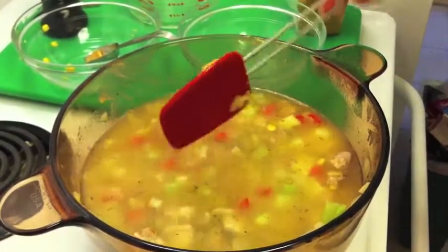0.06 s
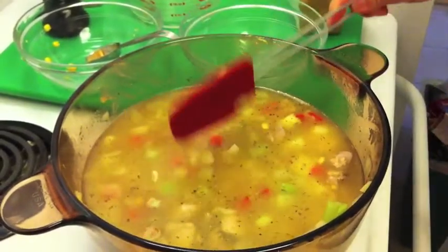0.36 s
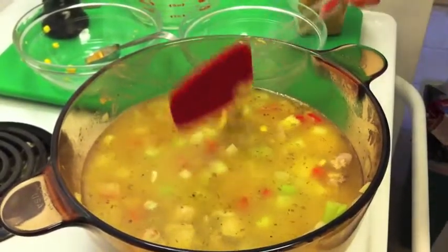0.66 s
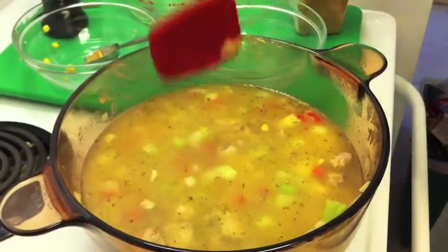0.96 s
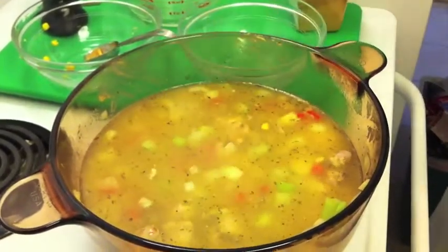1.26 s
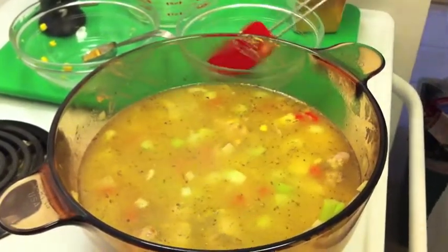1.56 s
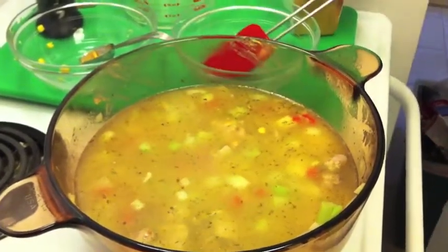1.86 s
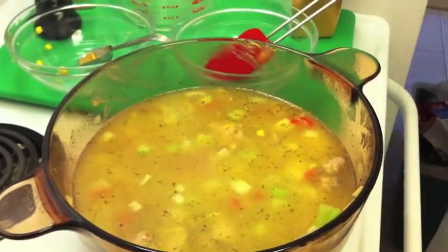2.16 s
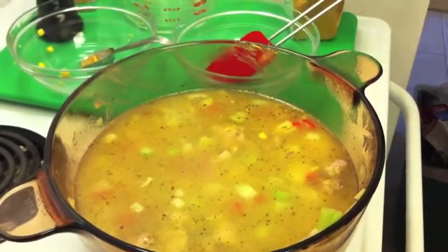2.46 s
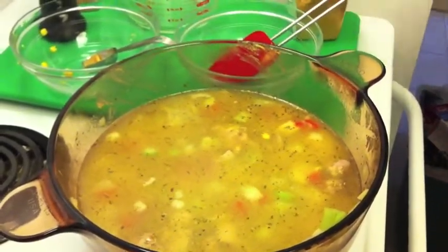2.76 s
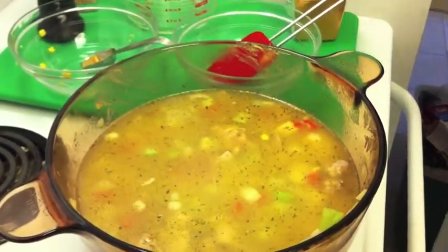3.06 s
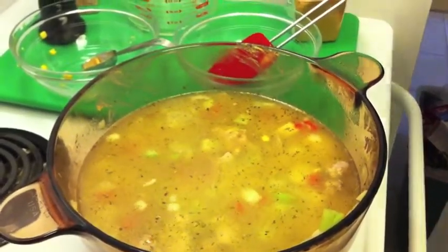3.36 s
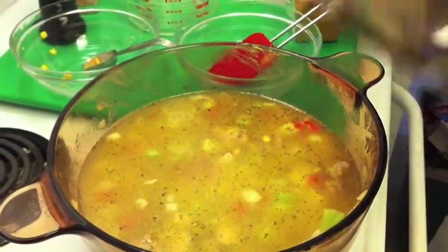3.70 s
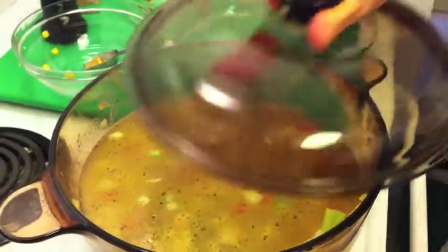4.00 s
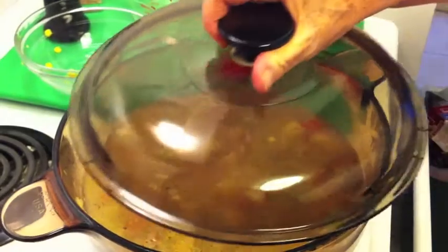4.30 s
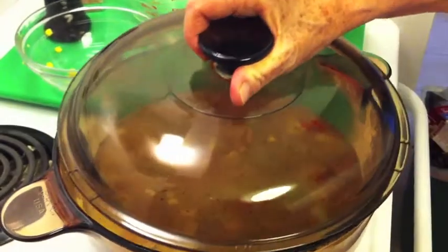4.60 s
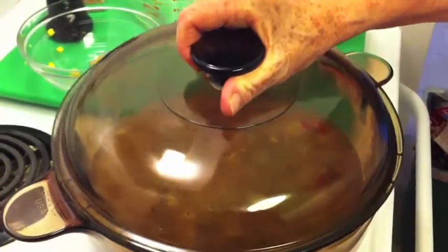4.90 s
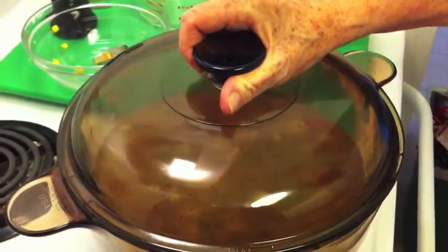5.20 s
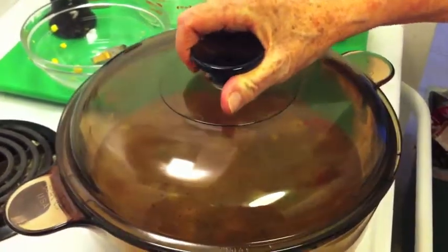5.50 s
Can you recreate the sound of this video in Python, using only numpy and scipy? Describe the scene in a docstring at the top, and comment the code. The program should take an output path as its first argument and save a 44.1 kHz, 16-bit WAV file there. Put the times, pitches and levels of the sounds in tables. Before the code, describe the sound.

In a small kitchen with faint room noise and hiss, heard from close by, a spatula is knocked against a glass pot in five quick taps. It is laid in a glass bowl with a soft rattle and two brighter clinks. Dull, quiet knocks and a few light ticks lead to the loudest sound: a glass lid landing on the pot with a clink, a brief high ring and a fast clatter.

```python
"""In a small, quiet kitchen, a rubber spatula is tapped clean on a glass pot of soup close by.
After a short crackle it drops into a glass bowl and rocks to rest, with a tick and a faint plop.
The glass lid is picked up with dull knocks; brushing, pings, a breath-like swell and clicks follow.
Last, the lid touches the pot, sings as it slides on the rim, and clatters into its seat.
Each blow on glass is a short crack, a noisy clatter and a set of ringing tones (modes)."""
import sys
import numpy as np
from scipy import signal
from scipy.io import wavfile

SR = 44100
rng = np.random.default_rng(int(sys.argv[2]) if len(sys.argv) > 2 else 0)


def waveform_to_disk(signal):
    """Save audio, clipped to [-1, 1], as 16-bit WAV at the path in sys.argv[1]."""
    frames = np.transpose(np.atleast_2d(signal))
    scaled = np.clip(frames, -1, 1) * 32767
    samples = np.round(scaled).astype(np.int16)
    wavfile.write(sys.argv[1], SR, samples)


N = 244557

# loudness of the background: t/s, room noise level/dB, hiss level/dB
BACKGROUND_LEVELS = [(0, -66, -81), (1.0, -67, -94), (1.3, -72, -86), (1.8, -72, -80), (2.1, -68, -72),
                     (3.4, -67.5, -67), (4.0, -68.5, -71), (5.55, -64.5, -71)]
# tone colour of the room noise and the hiss: f/Hz, level/dB
ROOM_COLOUR = [(25, 14), (70, -3), (130, 1), (260, 0.5), (450, -6), (1100, -5), (3000, -17), (8000, -26.5)]
HISS_COLOUR = [(2000, 0.5), (8000, -1.5), (15500, -6)]

# taps and light clicks on the pot, knocks on the lifted lid, the lid landing: t/s, level/dB
SPATULA_TAPS = [(0.2803, -34.5), (0.4385, -40.5), (0.5565, -35), (0.7217, -29.5), (0.9025, -31.5)]
POT_CLICKS = [(3.643, -42.5), (3.681, -49)]
LID_KNOCKS = [(2.593, -50), (2.683, -49.5), (2.705, -51.5)]
LID_LANDINGS = [(4.861, -42.5), (5.0407, -24), (5.072, -37), (5.1452, -34), (5.158, -32.5), (5.1956, -14.5),
                (5.2152, -23.5), (5.2316, -22), (5.2421, -26.5)]
# the spatula falls into the bowl and shifts twice: t/s, level/dB, treble tilt/(dB per octave)
BOWL_HITS = [(1.685, -45.5, -6), (1.702, -43.5, -6), (1.7277, -45.5, -5.5), (1.757, -53.5, -4),
             (2.1748, -32.5, 4.5), (2.183, -38.5, 2), (2.196, -38, 1), (2.3834, -41.5, 6),
             (2.388, -43, 3.5), (2.438, -52.5, -1)]

# the tones each object rings with: f/Hz, level/dB, t60/s (the time to fade by 60 dB)
POT_TONES = [(842, -19.5, 0.3), (1456, -9.5, 0.16), (1545, -16, 0.14), (13450, -14, .05)]
BOWL_TONES = [(374.2, -23.5, 0.26), (757, -22.5, 0.13), (1136, -17, 0.13), (1561, -14.5, 0.17),
              (1769, -10, 0.18), (1866, -14, 0.14), (3060, -20.5, 0.12), (3540, -10, 0.081),
              (4645, 2, 0.08), (4754, -6, 0.07), (6590, -8.5, 0.15), (8660, -12.5, 0.09), (8810, -12, 0.09),
              (9600, -13, 0.14), (10290, -17, .11), (10720, -20.5, 0.11), (11150, -16, 0.11),
              (12280, -19, 0.1), (13680, -19.5, .12), (14080, -20, .11), (14560, -23, .11)]
ROCKING_TONES = [(1010, -3.5, 0.057), (1134, -4, 0.05), (1930, -6.5, 0.1)]
LIFT_TONES = [(127, -3, 0.2), (420, 0.5, 0.11)]
RIM_TONES = [(2843, -6, 0.15), (2883, -14, 0.13), (3702, -12.5, 0.16), (4075, -6.5, 0.13),
             (4352, -0.5, 0.14), (6128, -16.5, 0.22), (6270, -17.5, 0.12), (8125, -23.5, 0.23),
             (8900, -36, .15), (10270, -25.5, 0.16), (12685, -32.5, .17), (13750, -37, .14),
             (14070, -33, .14), (15167, -34, .14)]  # the lid's high tones
TILTED_TONES = [(366.5, -3, 0.15), (598, -23, 0.6), (985, -14.5, 0.28), (1504, -9, 0.15),
                (1544, -10.5, 0.6), (1724, -8, 0.22), (2000, -7.5, 0.11)]  # lid on one edge
SEATED_TONES = [(255, -3.5, 0.1), (339, -13, 0.17), (903, -15.5, 0.28), (1103, -15.5, 0.21),
                (1397, -11.5, 0.14), (1460, -3, 0.23), (1664, -9, 0.23), (1584, -6.5, 0.16),
                (1710, -10, 0.26), (1990, -19, 0.26)]  # lid on the whole rim
# tone colour of the clatter, a crowd of short-lived tones under the clear ones: f/Hz, level/dB
POT_CLATTER = [(50, -14), (130, -6), (350, -0.5), (600, -3.5), (1400, 1), (2800, -9), (3700, 3.5),
               (4500, 3.5), (5500, -6.5), (6800, -0.5), (10000, -4), (16000, -7)]
BOWL_CLATTER = [(100, -9.5), (500, -8.5), (750, 5.5), (1800, 7.5), (2300, 4), (2800, -6.5), (3600, 5),
                (4700, 4), (5800, -0.5), (6600, 1.5), (7600, -11.5), (10000, -5.5), (15500, -25)]
LIFT_CLATTER = [(130, -2), (450, 0), (750, -4.5), (1600, -6.5), (8000, -41)]
LID_CLATTER = [(70, -31), (135, -9), (200, 8.5), (480, -4.5), (900, 2), (1700, 1), (2300, -1.5),
               (3400, -10), (4400, -5), (5400, -21), (6300, -16.5), (7300, -27.5), (10800, -32),
               (15500, -41)]

# dry ticks close by: t/s, level/dB, treble tilt/(dB per octave)
DRY_TICKS = [(1.918, -42.5, -5), (2.329, -49.5, -3), (3.9625, -46.5, -3.5), (4.5225, -46, -3),
             (4.861, -43.5, -5)]
# faint brushing as things are handled: middle t/s, length/s, level/dB
BRUSH_STROKES = [(2.495, 0.094, -61.5), (3.21, 0.13, -58), (3.565, .05, -59.5)]
# a faint, soft, breath-like swell of noise: middle t/s, length/s, level/dB
SOFT_SWELLS = [(3.425, 0.21, -61.5)]
# the rim sings as the lid is lifted or seated: middle t/s, length/s, f/Hz, level/dB
RIM_SLIDES = [(2.75, 0.14, 2420, -64), (2.78, .11, 1740, -64), (5.088, 0.08, 4342, -27.5),
              (5.078, .08, 2825, -35), (5.07, 0.07, 8120, -42), (5.07, .07, 6120, -39),
              (5.247, 0.035, 6130, -31), (5.252, .07, 2885, -33)]
# tiny glass pings: t/s, f/Hz, level/dB, t60/s
GLASS_PINGS = [(3.246, 3750, -56.5, 0.061), (3.597, 4240, -52.5, 0.044)]
# tone colour of the small noises: f/Hz, level/dB
CRACKLE_SPECTRUM = [(400, -36), (1000, -7), (2100, 1), (3500, -4), (6500, 3), (16000, -15)]
TICK_SPECTRUM = [(80, -12), (300, -6), (2000, -4.5), (4500, -13), (8000, -8), (10500, -31), (16000, -14)]
BRUSH_SPECTRUM = [(500, -27), (2500, -21), (4500, -2), (16000, -3)]
SWELL_SPECTRUM = [(700, -13), (1600, 3.5), (2700, -8), (14000, -22)]

FIRM_TAP_DB = -28.5  # softer taps are reckoned down from this level
RING_TIME = np.arange(SR // 2) / SR  # the half second after a blow


def amp(db):
    """Turns decibels into a factor to multiply by."""
    return 10 ** (np.asarray(db) / 20)


def read(points, hz):
    """Reads between the points of a curve, on a pitch-like (log) frequency scale."""
    f, value = np.transpose(points)
    return np.interp(np.log(hz + 1), np.log(f + 1), value)


def add(mix, s, sound):
    """Mixes a sound in, starting at s seconds."""
    part = mix[max(round(s * SR), 0):][:len(sound)]
    part += sound[:len(part)]


def colour(x, points, shape=lambda hz: 0, size=4096):
    """Gives a sound a tone colour (points plus shape, in dB); white noise keeps its power."""
    hz = abs(np.fft.fftfreq(size, 1 / SR))
    gain = amp(read(points, hz) + shape(hz))
    response = np.exp(np.conj(signal.hilbert(np.log(gain))))  # nothing sounds ahead of its cause
    taps = np.fft.ifft(response).real[:size // 2]
    return signal.fftconvolve(x, taps / np.linalg.norm(taps))[:len(x)]


def background(dip_s=1.59, dip_length_s=0.12, depth_db=-11, hiss_share=0.49):
    """Low room noise and a thin hiss; the level dips briefly after the crackle."""
    s, room_db, hiss_db = np.transpose(BACKGROUND_LEVELS)
    t = np.arange(N) / SR
    dip_db = depth_db * np.exp(-(2 * (t - dip_s) / dip_length_s) ** 4)
    room = amp(np.interp(t, s, room_db) + dip_db) * colour(rng.standard_normal(N), ROOM_COLOUR)
    hiss_gain = amp(np.interp(t, s, hiss_db) + hiss_share * dip_db)
    return room + hiss_gain * colour(rng.standard_normal(N), HISS_COLOUR)


def touch_db(hz, tilt_db, thud_db, knee_hz=1400):
    """A hard contact lifts the treble above the knee (tilt per octave); a heavy one adds thud."""
    return tilt_db * np.log2(np.hypot(hz, knee_hz) / 2000) + thud_db / (1 + (hz / 500) ** 4)


def spot_db(hz, depth_db=4.5, spacing_hz=170):
    """Each spot that is hit favours its own chance set of high glass tones."""
    grid = np.arange(200) * spacing_hz
    return depth_db * np.interp(hz, grid, rng.standard_normal(len(grid))) * hz / (hz + 2000)


def ringing(hz, tone_db, t60, detune=0.0012, uneven_db=1.0):
    """Fading tones after a blow; the spot that is hit shifts their pitch and strength a little."""
    t = RING_TIME[:, None]
    shift, strength = rng.standard_normal((2, len(hz)))
    sign = (-1) ** np.arange(len(hz))  # neighbouring tones start in opposite directions
    fade = amp(tone_db + uneven_db * strength - 60 * t / t60)
    return np.sum(sign * fade * np.sin(2 * np.pi * hz * (1 + detune * shift) * t), axis=1)


def struck(blows, tones, spectrum, crack_db, crack_t60, clatter_t60, damping, crowd_db, crowd_hz):
    """Each blow on glass gives a crack, a clatter whose treble dies first, and clear tones."""
    out, t = np.zeros(N), RING_TIME
    hz, tone_db, t60 = np.transpose(tones)
    width = crowd_hz * np.sqrt(hz / 2000)

    def crowding_db(f):
        """A chattering contact gathers the clatter around the clear tones."""
        nearness = np.max((1 + ((f[:, None] - hz) / width) ** 2) ** -2, 1)
        return 10 * np.log10(1 + amp(crowd_db) ** 2 * nearness)

    for s, db, tilt_db, thud_db, ring_db in blows:
        noise = rng.standard_normal(len(t))
        band_hz, age, bands = signal.stft(noise, SR, nperseg=256)
        band_t60 = clatter_t60 * (np.maximum(band_hz, 500) / 2000) ** -damping
        clatter = signal.istft(bands * amp(-60 * age / band_t60[:, None]), SR, nperseg=256)[1][:len(t)]
        contact = amp(13.5) * (t == 0)  # a spike at the instant of touching
        crack = noise * amp(-60 * t / crack_t60) + contact
        sharp = amp(crack_db + min(tilt_db, 0))  # a dull contact cracks less
        burst = (clatter + sharp * crack) / (1 + sharp)
        burst = colour(burst, spectrum,
                       lambda f: touch_db(f, tilt_db, thud_db) + crowding_db(f) + spot_db(f))
        ring = ringing(hz, tone_db + ring_db + touch_db(hz, tilt_db, thud_db), t60)
        add(out, s, amp(db) * (burst + ring))
    return out


def tap(s, db, tilt_db=2, tilt_slope=0.21, thud_db=-6, ring_db=-11, choke_slope=0.62):
    """A tap has little bass; a firmer one is brighter, and the rubber chokes more of the ring."""
    force_db = db - FIRM_TAP_DB
    return s, db, tilt_db + tilt_slope * force_db, thud_db, ring_db - choke_slope * force_db


def rebounds(s, db, gap_s=0.0215, firm_db=-42, force_slope=2.3, fade_db=4,
             tilt_db=-8, thud_db=3, ring_db=-9):
    """The rubber blade flops back with two dull thuds that only firm taps bring out."""
    first_db = firm_db + force_slope * (db - FIRM_TAP_DB)
    return [(s + (k + 1) * gap_s, first_db - k * fade_db, tilt_db, thud_db, ring_db) for k in range(2)]


def spatula_on_pot(click_tilt_db=6, click_thud_db=-14, click_ring_db=-22):
    """The pot is struck by taps with their rebounds, and later by two light, bright clicks."""
    blows = [blow for s, db in SPATULA_TAPS for blow in [tap(s, db)] + rebounds(s, db)]
    blows += [(s, db, click_tilt_db, click_thud_db, click_ring_db) for s, db in POT_CLICKS]
    return struck(blows, POT_TONES, POT_CLATTER, crack_db=4, crack_t60=0.014,
                  clatter_t60=0.17, damping=0.53, crowd_db=3.5, crowd_hz=50)


def snaps(rows, spectrum, t60):
    """Tiny contacts: bursts of noise that die within milliseconds."""
    out, t = np.zeros(N), RING_TIME[:SR // 20]
    for s, db, tilt_db in rows:
        burst = rng.standard_normal(len(t)) * amp(-60 * t / t60)
        add(out, s, amp(db) * colour(burst, spectrum, lambda hz: touch_db(hz, tilt_db, 0)))
    return out


def crackle(start_s=1.5225, length_s=0.016, peak_db=-35, edge_db=-10, tilt_db=-0.7, count=6):
    """A quick run of dry snaps that swells and dies."""
    progress = np.linspace(0, 1, count)
    levels = peak_db + edge_db * (1 - np.sin(np.pi * progress ** 0.61))
    rows = [(s, db, tilt_db) for s, db in zip(start_s + length_s * progress, levels)]
    return snaps(rows, CRACKLE_SPECTRUM, t60=0.015)


def spatula_in_bowl(thud_db=3.5, thud_slope=0.7, ring_db=-1, choke_slope=1.64):
    """Soft blows let the bowl ring; hard ones clatter and thud."""
    blows = [(s, db, tilt, thud_db + thud_slope * tilt, ring_db - choke_slope * tilt)
             for s, db, tilt in BOWL_HITS]
    return struck(blows, BOWL_TONES, BOWL_CLATTER, crack_db=-2.5, crack_t60=0.04,
                  clatter_t60=0.18, damping=0.44, crowd_db=4, crowd_hz=56)


def rocking(start_s=1.7835, gap_s=0.0576, first_db=-60, fade_db=1.1, tilt_db=-8, thud_db=-8, ring_db=5):
    """The spatula rocks in the bowl: seven soft, evenly spaced blows that fade."""
    blows = [(start_s + k * gap_s, first_db - k * fade_db, tilt_db, thud_db, ring_db) for k in range(7)]
    return struck(blows, ROCKING_TONES, BOWL_CLATTER, crack_db=12, crack_t60=0.044,
                  clatter_t60=0.095, damping=0.2, crowd_db=16, crowd_hz=90)


def plop(s=1.921, db=-50, start_hz=560, end_hz=190, fall_s=0.0046, t60=0.066):
    """A very short tone that falls quickly in pitch."""
    out, t = np.zeros(N), RING_TIME
    hz = end_hz + (start_hz - end_hz) * np.exp(-t / fall_s)
    add(out, s, amp(db - 60 * t / t60) * np.sin(2 * np.pi * np.cumsum(hz) / SR))
    return out


def soft_noise(rows, spectrum, grain_db=3):
    """Fine, grainy noise that swells and fades."""
    swell = np.zeros(N)
    for s, length, db in rows:
        add(swell, s - length / 2, amp(db) * np.hanning(round(length * SR)))
    grains = rng.standard_normal(N) * amp(grain_db * rng.standard_normal(N))
    return colour(swell * grains / grains.std(), spectrum)


def lid_lifted(tilt_db=-1, thud_db=-1.5):
    """Dull knocks as the hand takes up the lid."""
    blows = [(s, db, tilt_db, thud_db, 0) for s, db in LID_KNOCKS]
    return struck(blows, LIFT_TONES, LIFT_CLATTER, crack_db=-24, crack_t60=0.03,
                  clatter_t60=0.14, damping=0.11, crowd_db=6, crowd_hz=59.3)


def singing_rim():
    """Glass rubbing on glass feeds a single tone, which swells and fades."""
    out = np.zeros(N)
    for s, length, hz, db in RIM_SLIDES:
        t = np.arange(0, length, 1 / SR)
        add(out, s - length / 2, amp(db) * np.hanning(len(t)) * np.sin(2 * np.pi * hz * t))
    return out


def pings():
    """Glass that is barely touched rings with a single tone."""
    out, t = np.zeros(N), RING_TIME
    for s, hz, db, t60 in GLASS_PINGS:
        add(out, s, amp(db - 60 * t / t60) * np.sin(2 * np.pi * hz * t))
    return out


def lid_blows(rows, low_tones, thud_db, thud_slope, ring_db, ring_slope, hard_db=-22.5):
    """Glass on glass is fully bright from hard_db up; gentler landings barely wake the rim tones."""
    out = np.zeros(N)
    for s, db in rows:
        force_db = db - hard_db
        softness = max(-force_db, 0)
        tilt_db = max(0.47 - 0.99 * softness, -10)  # softer is duller, down to a limit
        blow = (s, db, tilt_db, thud_db + thud_slope * force_db, ring_db + ring_slope * softness)
        high_tones = [(hz, tone_db - 0.7 * softness, t60) for hz, tone_db, t60 in RIM_TONES]
        out += struck([blow], low_tones + high_tones, LID_CLATTER, crack_db=-14, crack_t60=0.047,
                      clatter_t60=0.17, damping=0.05, crowd_db=7.5, crowd_hz=56.5)
    return out


def lid_on_pot(seated_s=5.12):
    """The lid lands on one edge, then on the whole rim; the way it rests changes its low tones."""
    tilted = lid_blows([(s, db) for s, db in LID_LANDINGS if s < seated_s], TILTED_TONES,
                       thud_db=-10, thud_slope=-0.05, ring_db=-1.5, ring_slope=0.42)
    seated = lid_blows([(s, db) for s, db in LID_LANDINGS if s >= seated_s], SEATED_TONES,
                       thud_db=-2, thud_slope=0.24, ring_db=-1.5, ring_slope=0.05)
    return tilted + seated


def kitchen(x, t60s, first_s=0.005):
    """Scattered echoes off hob and walls; each band fades at its own speed (t60s: f/Hz, t60/s)."""
    t = RING_TIME
    echoes = rng.choice([-1., 1.], len(t)) * (rng.random(len(t)) < 0.1) * (t > first_s)
    hz, age, bands = signal.stft(echoes, SR, nperseg=256)
    tail = signal.istft(bands * amp(-60 * age / read(t60s, hz)[:, None]), SR, nperseg=256)[1]
    return signal.fftconvolve(x, tail / np.linalg.norm(tail))[:N]


def scene():
    """Pot, bowl and lid echo in the kitchen; the small noises close by stay dry."""
    pot = spatula_on_pot()
    bowl = spatula_in_bowl() + rocking()
    lift = lid_lifted() + pings()
    lid = singing_rim() + lid_on_pot()
    to_walls = amp(-12) * pot + amp(-8.5) * bowl + amp(-7) * lift + amp(-14) * lid
    echoes = kitchen(to_walls, t60s=[(200, 0.33), (1500, 0.26), (5000, 0.215), (14000, 0.165)])
    small = crackle() + snaps(DRY_TICKS, TICK_SPECTRUM, t60=0.013) + plop()
    soft = soft_noise(BRUSH_STROKES, BRUSH_SPECTRUM) + soft_noise(SOFT_SWELLS, SWELL_SPECTRUM)
    return (background() + pot + bowl + lift + lid + echoes + small + soft)[None]


def record(dry, low_cut_hz=100, high_cut_hz=16000):
    """The small microphone loses the bass, and the very highest treble is cut off."""
    low_cut = signal.butter(N=3, Wn=low_cut_hz, btype="high", fs=SR, output="sos")
    high_cut = signal.firwin(401, high_cut_hz, window=("kaiser", 8), fs=SR)
    return signal.oaconvolve(signal.sosfilt(low_cut, dry), high_cut[None], "same")


dry = scene()
out = record(dry)
waveform_to_disk(out)
```